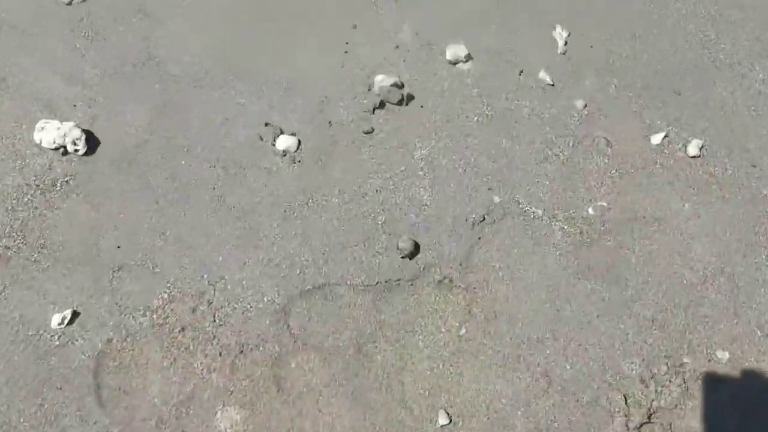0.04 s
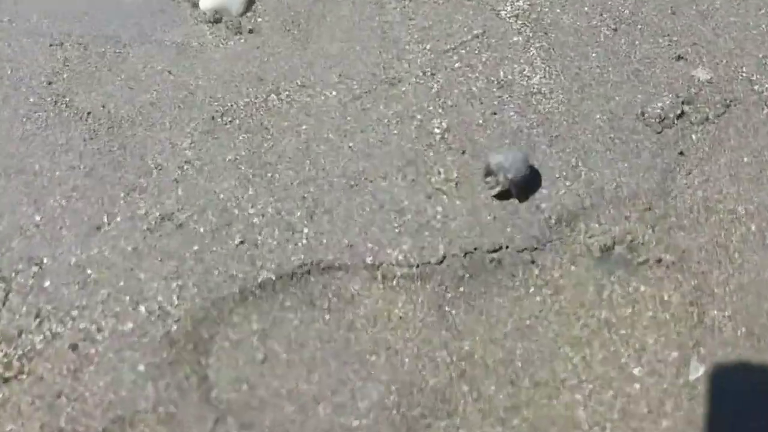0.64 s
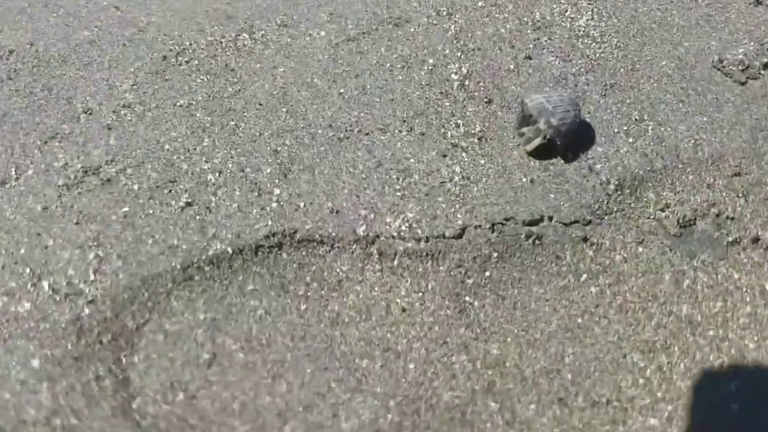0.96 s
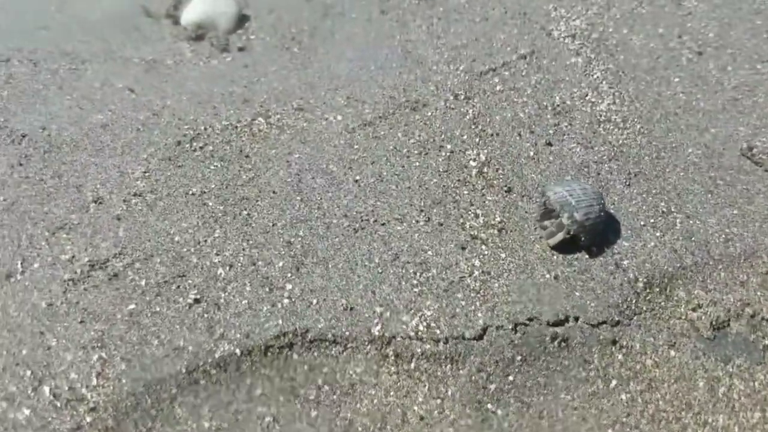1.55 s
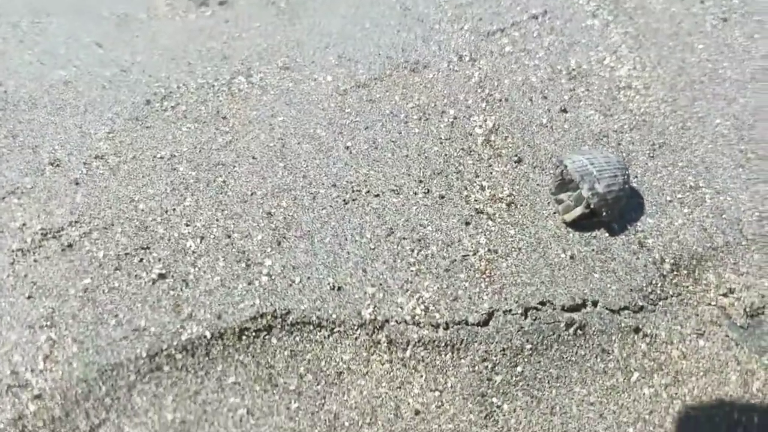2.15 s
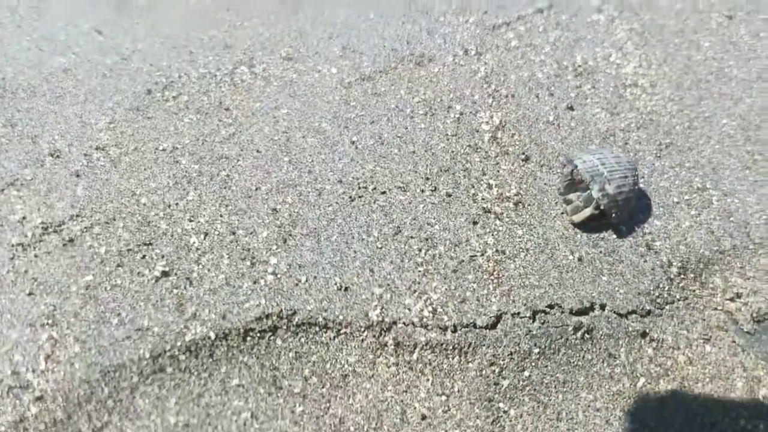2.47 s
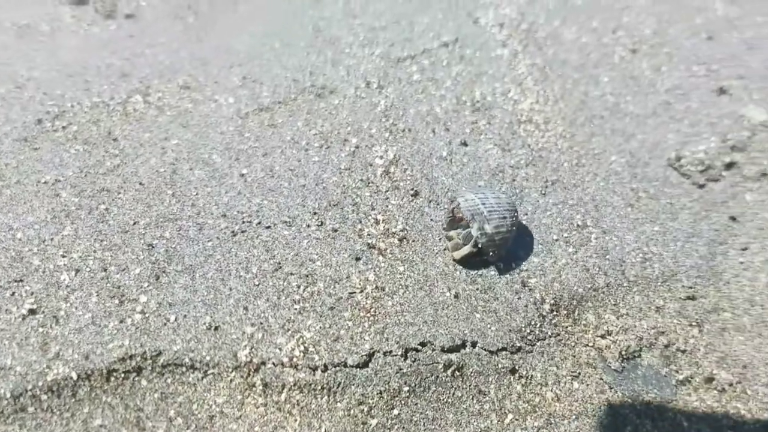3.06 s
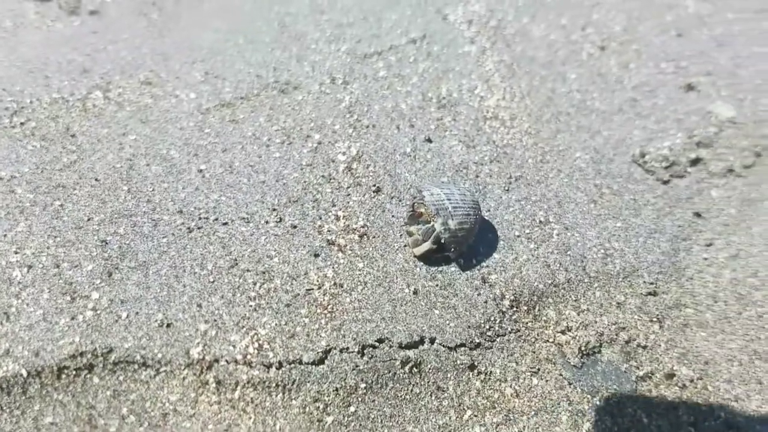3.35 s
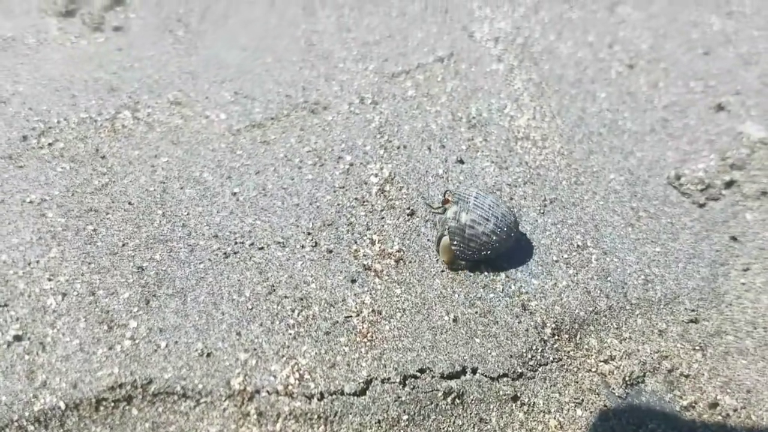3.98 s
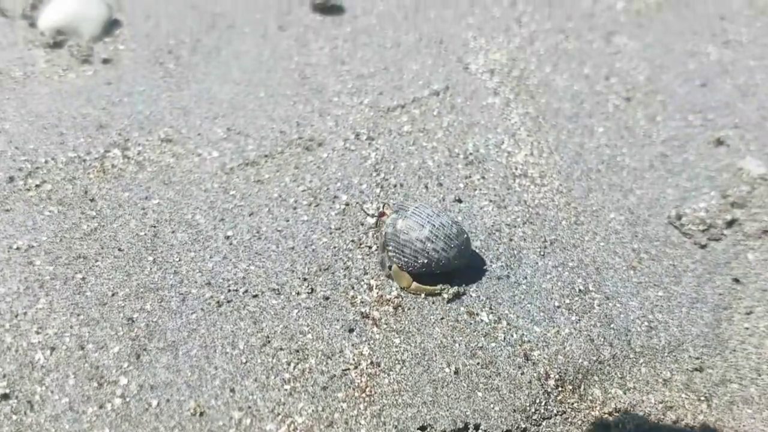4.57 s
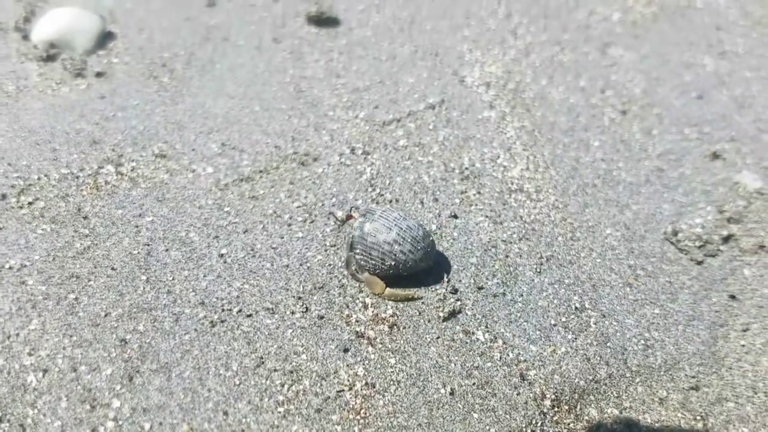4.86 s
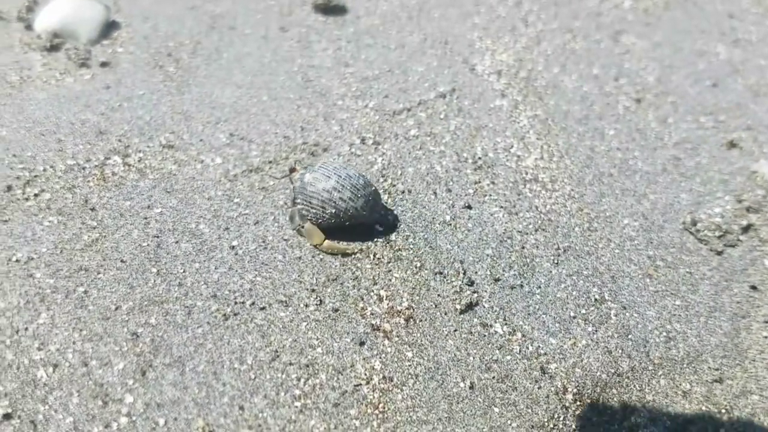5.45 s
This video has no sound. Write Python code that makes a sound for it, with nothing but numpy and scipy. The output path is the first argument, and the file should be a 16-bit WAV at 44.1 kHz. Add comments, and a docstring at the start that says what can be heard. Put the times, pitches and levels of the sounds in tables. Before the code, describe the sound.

Distant surf makes a soft, steady, low rush over a sandy beach. For the first two seconds, fingers shift on a small camera, right at the microphone: light taps, sliding skin, tiny ticks of grit, a short hollow creak and a quick cluster of knocks. Then the hand rests and the far waves swell slightly.

```python
"""Distant surf, hand on a camera.

Far breakers merge into a steady rush over a sandy beach. For the first two seconds fingers shift
their grip on a small camera: skin slides, taps and knocks on the case, the case creaks, grit ticks
under the fingertips. Then the hand rests and the surf slowly swells."""
import sys
import numpy as np
from scipy import signal
from scipy.fft import rfft, irfft, next_fast_len
from scipy.io import wavfile
from scipy.ndimage import uniform_filter1d

SR = 44100
rng = np.random.default_rng(int(sys.argv[2]) if len(sys.argv) > 2 else 0)


def generate_wav(sig):
    """Save sig (samples, or channels by samples) to the path in sys.argv[1] as 16-bit PCM at SR."""
    pcm = np.round(np.clip(np.atleast_2d(sig).T, -1, 1) * 32767).astype(np.int16)
    wavfile.write(sys.argv[1], SR, pcm)


N = 243431
TIME_S = np.arange(N) / SR

# Spectra of surf, sliding skin, crushed grit, microphone hiss: freq_hz, density_db
SURF_SPECTRUM = [(25, -23.5), (70, -13), (170, -8), (270, -8.5), (375, 1), (560, -0.5), (1000, -6.5),
                 (1300, -6.5), (1800, -11.5), (2050, -15.5), (2500, -17), (3200, -31.5), (5500, -48.5),
                 (9000, -72)]
SKIN_SPECTRUM = [(150, 0), (400, 3.5), (1300, 5.5), (2400, -2), (3200, -4.5), (4400, -7), (5200, -18.5),
                 (6300, -16), (7700, -20.5), (9700, -28.5), (12000, -20.5), (16000, -28)]
CRUNCH_SPECTRUM = [(500, 11), (2400, 12.5), (4400, 2.5), (6500, -1), (9600, -7), (12000, -8), (16000, -1)]
HISS_SPECTRUM = [(2000, 3.5), (4000, 2.5), (5500, -2), (9000, -6.5), (12000, -0.5), (15500, 2.5)]
# Slow swell of the surf: time_s, level_db
SURF_SWELL = [(0, -51), (.6, -53), (2.7, -52), (4.0, -50), (4.8, -49.5), (5.52, -50)]
# Microphone port response to grit: freq_hz, gain_db
PORT_RESPONSE = [(1000, 14.5), (4400, -3), (5300, -3), (6500, -11.5), (9600, -15.5), (12000, -7.5),
                 (16000, -11.5)]
# Modes of the case: freq_hz, weight_db, t60_s
CASE_MODES = [(132, -21.5, 0.1), (383, -22.5, 0.048), (1700, -18.5, 0.0043), (2390, -20, 0.0074)]
# Light finger taps, softer is lower: time_s, level_db, centre_hz
FINGER_TAPS = [(.0426, -26.5, 580), (.1231, -32, 554), (.3234, -30, 560), (.4220, -34, 1360),
               (.432, -27, 564), (.4570, -36, 565), (.4603, -28, 584), (.466, -47, 128), (1.031, -47, 186),
               (1.2331, -38, 1010), (1.2515, -39, 1500), (1.265, -50, 108), (1.5015, -24, 1170),
               (1.908, -30.5, 457)]
# Single grains under the fingers: start_s, level_db, centre_hz
GRIT_TICKS = [(.0561, -43, 11900), (0.13, -35.5, 2620), (.342, -44, 2200), (0.4214, -34, 7000),
              (0.512, -34.5, 7100), (.766, -41, 10000), (1.103, -43, 10000), (1.185, -44, 3520),
              (1.4628, -35.5, 1990), (1.4825, -36, 2490), (1.5203, -34, 11000), (1.526, -32.5, 13000),
              (1.5325, -39, 12000), (1.5871, -33, 3500), (1.9068, -46.5, 3600)]
# Squeaking fingertips: time_s, level_db, sigma_s, pitch_hz
FINGER_DRAGS = [(0.827, -61, 0.023, 1410), (1.015, -43.5, 0.014, 970), (1.113, -47.5, 0.014, 910)]
# Slips of the case under the grip: time_s, level_db, centre_hz
CREAK_SLIPS = [(1.1265, -16.5, 1360), (1.1299, -15.5, 886), (1.139, -36, 895)]
# Firm knocks of the hand: time_s, level_db, centre_hz, heave_db, crunch_db
HAND_KNOCKS = [(1.4657, -36, 350, -33.5, -62), (1.4854, -22.5, 416, -27, -41),
               (1.507, -16.5, 510, -30, -27), (1.5145, -26, 376, -34, -42), (1.6056, -21.5, 534, -38, -26),
               (1.6184, -20.5, 630, -27, -27.5)]
# Single louder waves: peak_s, level_db
BREAKER_PEAKS = [(2.79, -52.5), (3.37, -54), (4.62, -52.5), (4.85, -50.5), (5.08, -54)]

SCUFF_S, SCUFF_RISE_S, SCUFF_FALL_S = 0.823, 0.0094, 0.039


def undb(db):
    """Decibels to gain."""
    return 10 ** (np.asarray(db) / 20)


def unit(x):
    """Scale to rms 1."""
    return x / np.sqrt(np.mean(x ** 2))


def shape(x, spectrum):
    """Filter by rows of freq_hz, gain_db."""
    size = next_fast_len(N)
    hz, db = np.transpose(spectrum)
    bin_hz = np.fft.rfftfreq(size, 1 / SR) + 1
    gain = undb(np.interp(np.log(bin_hz), np.log(hz), db))
    return irfft(rfft(x, size) * gain, size)[:N]


def colour(x, spectrum):
    """Filter by a spectrum, rms 1."""
    return unit(shape(x, spectrum))


def resonate(x, hz, q):
    """Two-pole resonance, gain 1 at centre."""
    w = 2 * np.pi * min(hz, SR * 4 / 9) / SR
    a = np.sin(w) / (2 * q)
    return signal.lfilter([a, 0, -a], [1 + a, -2 * np.cos(w), 1 - a], x)


def band_noise(hz, q):
    """Noise through one resonance twice, rms 1."""
    return unit(resonate(resonate(rng.standard_normal(N), hz, q), hz, q))


def wander(rate_hz):
    """Random steps smoothed twice, rms 1."""
    hold = int(SR / rate_hz)
    steps = np.repeat(rng.standard_normal(N // hold + 1), hold)
    return unit(uniform_filter1d(uniform_filter1d(steps, hold), hold)[:N])


def grains(rate_hz):
    """Clicks of random size and timing."""
    return (rng.random(N) < rate_hz / SR) * rng.standard_normal(N)


def burst(peak_s, rise_s, fall_s):
    """Exponential rise and fall, 1 at peak_s."""
    return np.exp(-np.maximum((peak_s - TIME_S) / rise_s, (TIME_S - peak_s) / fall_s))


def add(out, start_s, sound):
    """Mix in a short sound."""
    i = max(int(start_s * SR), 0)
    out[i:i + len(sound)] += sound[:N - i]


def surf(calm_db=-51.5, calm_foam_db=-1.0, foam_db_per_db=0.58, churn_db=0.5, surge_db=0.7, bands=9):
    """Far breakers merge; each octave churns alone, and fresh foam brightens the swell."""
    level_db = np.interp(TIME_S, *np.transpose(SURF_SWELL))
    foam_db = calm_foam_db + foam_db_per_db * (level_db - calm_db)
    size = next_fast_len(N)
    rush = rfft(colour(rng.standard_normal(N), SURF_SPECTRUM), size)
    bin_hz = np.fft.rfftfreq(size, 1 / SR) + 1
    octave = np.clip(np.log2(bin_hz / 40), 0, bands - 1)
    out = 0
    for k in range(bands):
        band = irfft(rush * np.maximum(1 - abs(octave - k), 0), size)[:N]
        has_foam = k >= 5  # 1280 Hz band and up
        out += band * undb(churn_db * wander(rate_hz=12) + has_foam * foam_db)
    return unit(out) * undb(level_db + surge_db * wander(rate_hz=5.1))


def skin_slide(slide_db=-59.5, creep_db=-65, rest_db=-75, scuff_db=-47, scatter_db=1.5, grit_db=-16):
    """Skin sticks and slips over case and grit: slides, scuffs once, creeps, rests."""
    grip_s, settle_s, ease_s = 1.14, 1.66, 0.02
    slips = grains(rate_hz=5000) * undb(scatter_db * rng.standard_normal(N))
    grit = undb(grit_db) * colour(grains(rate_hz=53), PORT_RESPONSE)
    steady_db = np.interp(TIME_S, [grip_s, grip_s + ease_s, settle_s, settle_s + ease_s],
                          [slide_db, creep_db, creep_db, rest_db])
    effort = undb(steady_db) + undb(scuff_db) * burst(SCUFF_S, SCUFF_RISE_S, SCUFF_FALL_S)
    return (colour(slips, SKIN_SPECTRUM) + grit) * effort


def swings(rows, span_rad, edge_gain, edge_ratio=2.7, size=1400):
    """Each contact pushes the case in and lets go; its hard onset adds a narrower swing."""
    t = (np.arange(size) - size / 2) / SR
    out = np.zeros(N)
    for s, db, hz in rows:
        phase = 2 * np.pi * hz * t
        soft = np.sin(phase) * np.exp(-(phase / span_rad) ** 2 / 2)
        hard = edge_ratio * phase * np.exp((1 - (edge_ratio * phase) ** 2) / 2)
        add(out, s + t[0], undb(db) * (soft / soft.max() + edge_gain * hard))
    return out


def case(pushes, ring_db=5):
    """The case passes each push on and rings briefly."""
    ring = 0
    for hz, db, t60_s in CASE_MODES:
        q = np.pi * hz * t60_s / np.log(1000)
        ring += undb(db) * np.sqrt(hz * t60_s) * resonate(pushes, hz, q)
    return pushes + undb(ring_db) * ring


def taps():
    """Fingers land on the case, one swing each."""
    return case(swings(FINGER_TAPS, span_rad=1.59, edge_gain=0.26))


def cracks(rows, t60_s=0.0059, q=0.48, size=700):
    """Tiny dry noise bursts, heard through the microphone port."""
    out = np.zeros(N)
    decay = np.exp(-np.log(1000) * np.arange(size) / SR / t60_s)
    for s, db, hz in rows:
        noise = rng.standard_normal(size) * decay
        crack = resonate(resonate(noise, hz, q), hz, q)
        add(out, s, undb(db) * crack / abs(crack).max())
    return shape(out, PORT_RESPONSE)


def ticks(clack_gain_db=-9.5, clack_hz=2300):
    """Grit snaps past the fingertips and clacks on the case."""
    clacks = [(s, db + clack_gain_db, clack_hz) for s, db, _ in GRIT_TICKS]
    return cracks(GRIT_TICKS) + cracks(clacks)


def stray_grit(gain_db=-50):
    """Loose grains tick faintly, even with the hand at rest."""
    return undb(gain_db) * shape(grains(rate_hz=2.1), PORT_RESPONSE)


def scuff_rasp(level_db=-57):
    """The scuff drags sand over the case."""
    return undb(level_db) * band_noise(hz=2860, q=2.1) * burst(SCUFF_S, SCUFF_RISE_S, SCUFF_FALL_S)


def drags():
    """A fingertip sticks harder and briefly slips at a loose pitch."""
    return sum(undb(db) * band_noise(hz, q=1.8) * np.exp(-((TIME_S - s) / sigma_s) ** 2 / 2)
               for s, db, sigma_s, hz in FINGER_DRAGS)


def creak(rasp_gain_db=-13.5, rasp_hz=2890, flex_s=1.1281, flex_db=-26, flex_hz=266):
    """The case slips and its wall flexes once; undamped by fingers, the swings last and sound hollow."""
    rasps = [(s, db + rasp_gain_db, rasp_hz) for s, db, _ in CREAK_SLIPS]
    return swings(CREAK_SLIPS + rasps + [(flex_s, flex_db, flex_hz)], span_rad=3.54, edge_gain=0)


def knocks(heave_hz=109, shudder_gain_db=-18, crunch_gain_db=-12, snap_gain_db=1.5, snap_hz=12000):
    """After each blow the case heaves and shudders; one grain snaps and the grit crunches."""
    snap_lead_s, heave_lag_s, shudder_lag_s = 0.00041, 0.00438, 0.0074
    blows, heaves, snaps = [], [], []
    shudder_env = crunch_env = 0
    for s, db, hz, heave_db, crunch_db in HAND_KNOCKS:
        blows.append((s, db, hz))
        heaves.append((s + heave_lag_s, heave_db, heave_hz))
        snaps.append((s - snap_lead_s, crunch_db + snap_gain_db, snap_hz))
        shudder_env += undb(db + shudder_gain_db) * burst(s + shudder_lag_s, 0.0055, 0.0081)
        crunch_env += undb(crunch_db + crunch_gain_db) * burst(s, 0.0039, 0.0031)
    pushes = swings(blows, span_rad=1.3, edge_gain=0.3) + swings(heaves, span_rad=1.7, edge_gain=0.17)
    snap = cracks(snaps)
    shudder = shudder_env * band_noise(hz=322, q=0.96)
    crunch = crunch_env * colour(grains(rate_hz=3000), CRUNCH_SPECTRUM)
    return case(pushes + shudder) + snap + crunch


def breakers():
    """Single waves fall a little louder, as dull swells."""
    envelope = sum(undb(db) * burst(s, rise_s=0.035, fall_s=0.05) for s, db in BREAKER_PEAKS)
    return envelope * band_noise(hz=430, q=1.54)


def scene():
    """Surf far off, hand on the camera; mono."""
    hand = skin_slide() + scuff_rasp() + drags() + taps() + knocks() + creak()
    return (surf() + breakers() + hand + ticks() + stray_grit())[None]


def record(dry, hiss_db=-76.5, cutoff_hz=15850):
    """Thin microphone hiss, then a steep low-pass."""
    hiss = undb(hiss_db) * colour(rng.standard_normal(N), HISS_SPECTRUM)
    lowpass = signal.ellip(10, 0.2, 70, cutoff_hz, fs=SR, output="sos")
    return signal.sosfilt(lowpass, dry + hiss)


dry = scene()
out = record(dry)
generate_wav(out)
```